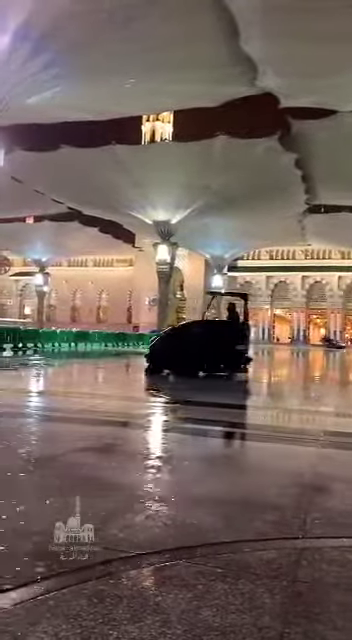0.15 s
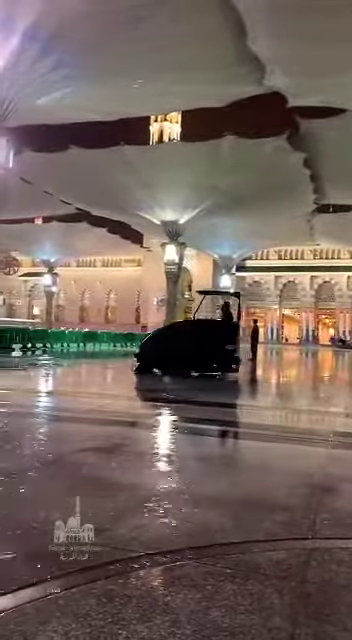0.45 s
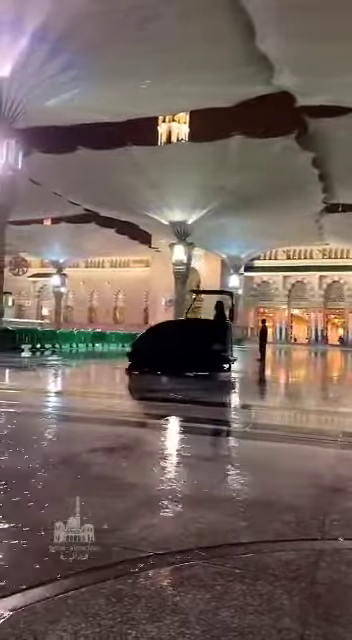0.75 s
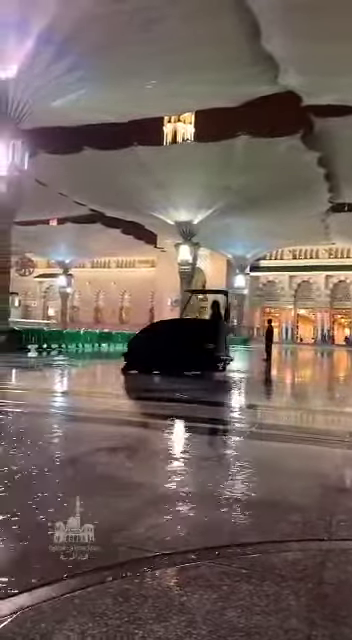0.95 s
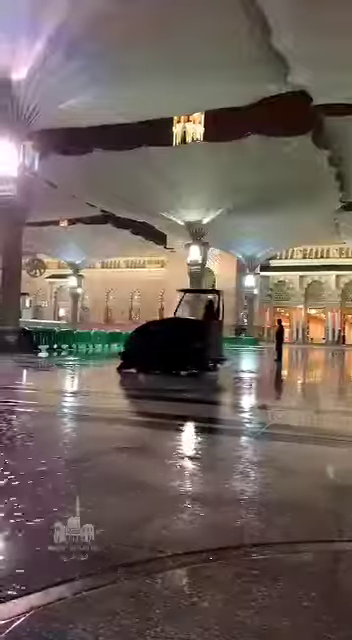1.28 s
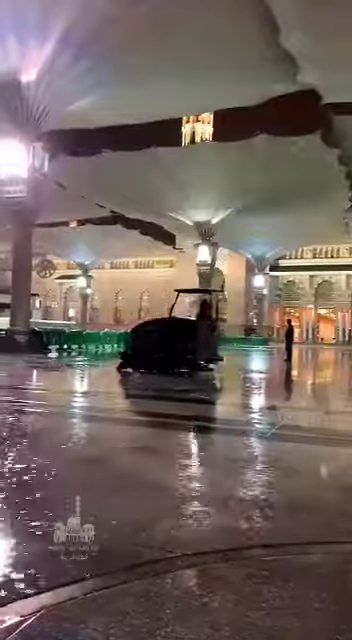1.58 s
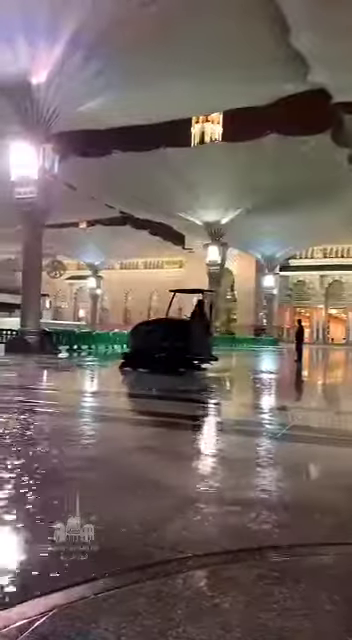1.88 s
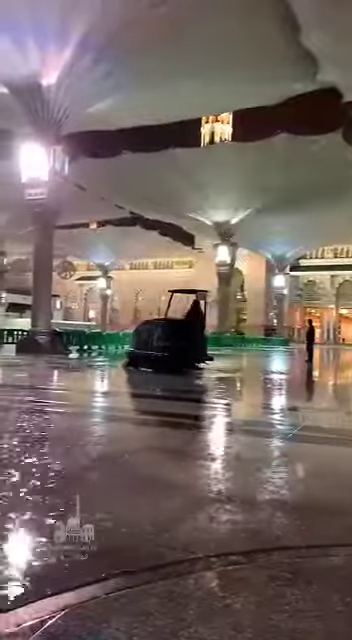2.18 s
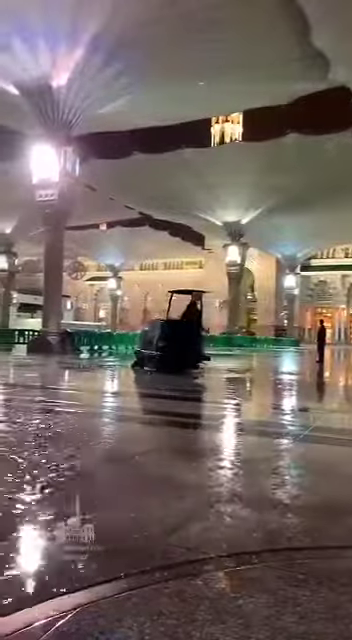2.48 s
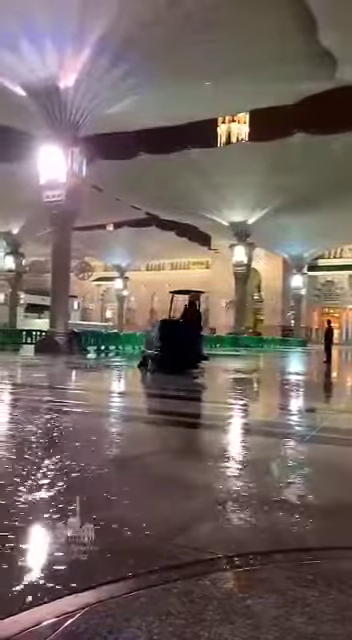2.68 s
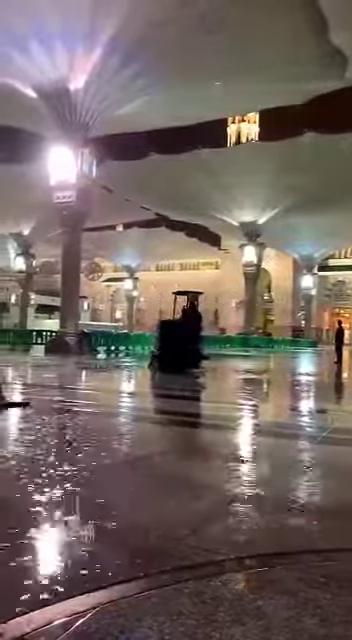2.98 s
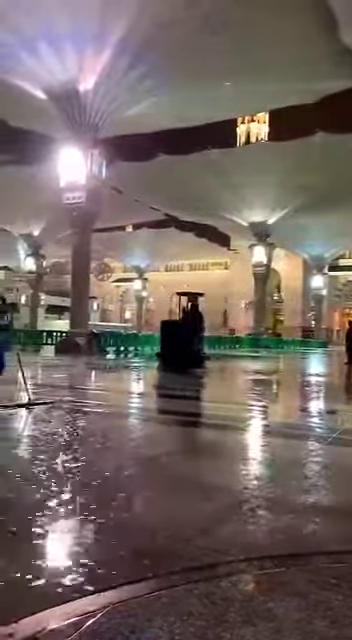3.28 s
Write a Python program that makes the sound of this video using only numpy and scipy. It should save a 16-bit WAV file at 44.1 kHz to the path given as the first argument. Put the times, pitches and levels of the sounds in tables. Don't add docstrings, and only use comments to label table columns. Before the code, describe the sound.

Ride-on floor cleaner runs steadily across wet stone under canopies, growling and whooshing, then growing quieter; fine water hiss surrounds it, wind puffs bump the microphone, and close drops tick towards the end.

```python
import sys
import numpy as np
from scipy import signal
from scipy.fft import rfft, irfft, next_fast_len
from scipy.io import wavfile
from scipy.ndimage import uniform_filter1d, minimum_filter1d, map_coordinates

SR = 44100
rng = np.random.default_rng(int(sys.argv[2]) if len(sys.argv) > 2 else 0)


def voltage_ratio(decibels):
    exponent = np.asarray(decibels, float) / 20
    return 10 ** exponent


def wrap_up_sound(samples):
    columns = np.atleast_2d(samples).T
    tamed = np.clip(columns, -1, 1)
    steps = np.round(tamed * 32767).astype(np.int16)
    wavfile.write(sys.argv[1], SR, steps)


N = 152145


def unit(x):
    return x / np.sqrt(np.mean(x ** 2) + 1e-20)


def along(points, hz):
    f, v = np.transpose(points)
    return np.interp(np.log(hz + 1), np.log(f + 1), v, left=-120, right=-120)


def curve(rows):
    s, v = np.transpose(rows)
    return np.interp(np.arange(N) / SR, s, v)


def wobble(rate):
    knots = rng.standard_normal(int(N * 60 / SR) + 4)
    return map_coordinates(knots, [np.arange(N) * min(rate, 60) / SR])


def filtered(x, response):
    m = next_fast_len(N + 8192)
    return irfft(rfft(x, m) * response(np.fft.rfftfreq(m, 1 / SR)), m)[..., :N]


def rush(spectrum, patchy_db, bands_db=0):
    z = signal.stft(rng.standard_normal(N), nperseg=1024, noverlap=768)[2]

    def blotches(bins, frames):
        smooth = uniform_filter1d(rng.standard_normal(z.shape), size=bins, axis=0)
        return unit(uniform_filter1d(smooth, size=frames, axis=1))

    gain = voltage_ratio(patchy_db * blotches(8, 14) + bands_db * blotches(2, 70))
    x = signal.istft(z * gain, nperseg=1024, noverlap=768)[1][:N]
    return unit(filtered(x, lambda hz: voltage_ratio(along(spectrum, hz))))


# (time [s], firing rate [Hz])
SPEED = [(0.0, 63.43), (0.3, 65.18), (0.6, 64.62), (1.58, 60.42), (1.93, 61.47), (2.3, 64.9), (2.6, 65.66),
         (3.05, 62.1), (3.36, 62), (3.45, 64.1)]
# (multiple of firing rate, level [dB], flutter [dB], fade with distance [dB/dB], share aside)
EXHAUST = [
    (1, -21.5, 1.6, .4, .12),
    (2, -16.5, 2.23, 1, 0.11),
    (3, -18, 1.5, 0.42, 0.083),
    (4, -21, 2, .3, 0.15),
    (5, -37, 9, .6, 0.15),
    (6, -39, 7, 1, 0.28),
]
# (frequency [Hz], level [dB per Hz])
RUMBLE = [(20, -42.5), (40, -9), (60, 2), (85, -3), (150, 0), (300, -4), (700, -15), (1500, -20.5)]


def engine(fade_db):
    t = np.arange(N) / SR
    unrest_hz = .25 * wobble(24.38)
    turn = 2 * np.pi * np.cumsum(curve(SPEED) + unrest_hz) / SR
    boom_db = 2.5 * np.cos(2 * np.pi * (t - 0.11) / 2.2)
    ahead, aside = np.zeros((2, N))
    for k, db, flutter_db, fade, share in EXHAUST:
        gain = np.sqrt(2) * voltage_ratio(db + fade * fade_db + (k == 2) * boom_db)
        drift = .2 * wobble(15)
        ahead += gain * voltage_ratio(flutter_db * wobble(9)) * np.sin(k * turn + drift)
        aside += gain * share * voltage_ratio(flutter_db * wobble(7.3)) * np.sin(k * turn + wobble(7))
    ahead += voltage_ratio(-17.5 + 0.22 * fade_db) * rush(RUMBLE, patchy_db=0.5)
    return np.array([ahead, aside])


# (start [s], length [s], frequency [Hz], glide [Hz/s], level [dB])
WHINES = [
    (-.3, 1.7, 414, -8, -29),
    (-.2, 1.4, 497, 0, -35),
    (1.15, .85, 903, 0, -33),
    (1.05, .45, 2610, -100, -42),
    (2.94, .09, 3010, 0, -41),
    (2.18, .14, 550, 0, -32),
]
# (start [s], length [s], frequency [Hz], glide [Hz/s], level [dB])
SIDE_WHINES = [
    (.8, .7, 500, 0, -40),
    (.8, .6, 750, 0, -42),
    (.6, .8, 995, 0, -45),
    (1.75, .6, 606, 0, -37),
    (2, .35, 1010, 0, -42),
    (.8, 1.8, 2640, 0, -53),
]


def whines(rows):
    t, out = np.arange(N) / SR, np.zeros(N)
    for start, length, hz, glide, db in rows:
        since = t - start
        swell = np.sin(np.pi * np.clip(since / length, 0, 1)) ** .5
        gain = voltage_ratio(db + 6.5 + 1.44 * wobble(7.8))
        phase = 2 * np.pi * (hz + glide * since / 2) * since + 0.44 * wobble(14)
        out += gain * swell * np.sin(phase)
    return out


# (frequency [Hz], level [dB per Hz])
ROAR = [(250, -25.5), (600, 0.5), (1300, -9.5), (1900, -6.5), (2080, -12), (3100, -10.5), (4000, -16),
        (5900, -33.5)]
# (frequency [Hz], width [Hz], level [dB])
ROAR_DIP = [(812, 17, -14), (908, 49, 3.5), (746, 42, 1.5), (2620, 150, 1), (3690, 38, 2)]
# (frequency [Hz], level [dB per Hz])
ROAR_ASIDE = [(40, -13.5), (120, -18.5), (450, -3.5), (1000, -9.5), (1700, -19), (2650, -15), (3500, -29.5),
              (9000, -58)]


def brushes(near_db):
    def colour(f):
        return voltage_ratio(sum(db * np.exp(-((f - hz) / width) ** 2) for hz, width, db in ROAR_DIP))

    fade_db = near_db - near_db.mean()
    ahead = voltage_ratio(5) * filtered(rush(ROAR, patchy_db=1.03, bands_db=2.12), colour)
    aside = voltage_ratio(1.5 - .5 * fade_db) * rush(ROAR_ASIDE, patchy_db=1.7, bands_db=2.1)
    return voltage_ratio(near_db + 0.24 * wobble(10)) * np.array([ahead, aside])


# (frequency [Hz], level [dB per Hz])
SPRAY_AHEAD = [(5000, 0), (6300, -1), (7000, -14), (12500, -11), (14300, 0), (15600, -2)]
# (frequency [Hz], level [dB per Hz])
SPRAY = [(2500, -20), (4200, -4.5), (5750, 1), (9000, -7), (12500, -14.5), (14500, -11.5), (15600, -14)]


def spray(near_db):
    fade_db = near_db - near_db.mean()
    ahead = voltage_ratio(-28.5 + .5 * fade_db) * rush(SPRAY_AHEAD, patchy_db=3.0)
    aside = voltage_ratio(-8 + .9 * fade_db) * rush(SPRAY, patchy_db=.6)
    return voltage_ratio(near_db.mean()) * np.array([ahead, aside])


# (time [s], length [s], level aside [dB], level ahead [dB])
GUSTS = [(0.019, 0.033, -14.5, -18), (0.118, 0.021, -20.5, -40.5), (0.29, 0.044, -14.5, -42),
         (.43, 0.044, -12.5, -27.5), (0.567, 0.046, -10.5, -43), (0.728, .1, -17.5, -27.5),
         (1.695, 0.088, -20.5, -36), (1.814, 0.038, -30, -12), (1.892, .03, -35.5, -9),
         (1.954, 0.024, -30, -11), (2.778, .04, -21.5, -18), (2.931, .04, -18, -14),
         (3.033, 0.051, -35, -14.5), (3.184, 0.024, -17.5, -18.5)]
# (frequency [Hz], level [dB per Hz])
BUFFET = [(30, -30), (80, 4.5), (200, -0.5), (450, -15), (900, -54)]
# (frequency [Hz], level [dB per Hz])
THUMP = [(30, -24.5), (60, -7.5), (88, -1.5), (130, -19), (300, -37.5)]


def gusts():
    t = np.arange(N) / SR

    def puffs(column):
        return np.sqrt(sum(voltage_ratio(2 * g[column]) * np.exp(-((t - g[0]) / g[1]) ** 2) for g in GUSTS))

    ahead = puffs(3) * voltage_ratio(-3.0 + 0.4 * wobble(32)) * rush(THUMP, patchy_db=-1.7)
    aside = puffs(2) * voltage_ratio(-4.5 + 1.7 * wobble(40)) * rush(BUFFET, patchy_db=-0.4)
    return np.array([ahead, aside])


# (time [s], peak level [dB], frequency [Hz])
DROPS = [
    (1.9, -24, 5500),
    (2.037, -25, 10500),
    (2.145, -24, 5000),
    (2.185, -24, 5000),
    (2.255, -24, 4500),
    (2.86, -24, 5000),
    (3.281, -23, 4500),
    (3.308, -24, 4500),
    (3.323, -15, 11500),
    (3.368, -26, 13000),
]


def drops():
    u = rng.random((500, 3))
    patter_s = u[:, 0] * N / SR
    patter_db = -36 - 2.8 * np.log(u[:, 1])
    patter_hz = 3200 * 3.5 ** u[:, 2] ** 1.5
    s, db, hz = np.r_[np.c_[patter_s, patter_db, patter_hz], DROPS].T[:, :, None]
    k = np.arange(64)
    tick = voltage_ratio(db) * np.sin(2 * np.pi * hz * k / SR) * np.exp(-k / SR * hz / 1.3)
    place = np.round(s * SR).astype(int) + k
    return np.bincount(place.ravel(), tick.ravel(), N + 64)[:N]


# (frequency [Hz], level [dB])
LEFT_DB = [(0, 0), (80, -.6), (300, -2.5), (1200, -1.1), (4000, 0), (23000, 0)]


def ears(mid):
    sign, lag_s = np.c_[[1, -1]], 3.2e-5

    def response(hz):
        return voltage_ratio(along(LEFT_DB, hz) / 2 * sign) * np.exp(-1j * np.pi * hz * lag_s * sign)

    return filtered(mid, response)


# (time [s], level [dB])
NEAR = [(0.03, -27), (0.07, -26.5), (2.15, -29), (2.43, -31), (2.65, -32), (2.95, -32.5), (2.98, -31.5),
        (3.42, -34)]


def scene():
    near_db = curve(NEAR)
    mid, side = engine(near_db - near_db.mean()) + brushes(near_db) + gusts()
    hiss_ahead, hiss_aside = spray(near_db)
    ticks = drops()
    mid = mid + whines(WHINES)
    side = side + whines(SIDE_WHINES) + ticks + hiss_aside
    return ears(mid) + hiss_ahead + voltage_ratio(-7.5) * ticks + [side, -side]


def low_pass(x):
    return signal.sosfilt(signal.butter(12, 15500, fs=SR, output="sos"), x)


def record(dry):
    hold = 200
    need = np.minimum(1, 1.0 / (np.abs(dry).max(axis=0) + 1e-9))
    held = dry * uniform_filter1d(minimum_filter1d(need, size=hold), size=hold)
    return low_pass(held)


dry = scene()
out = record(dry)
wrap_up_sound(out)
```